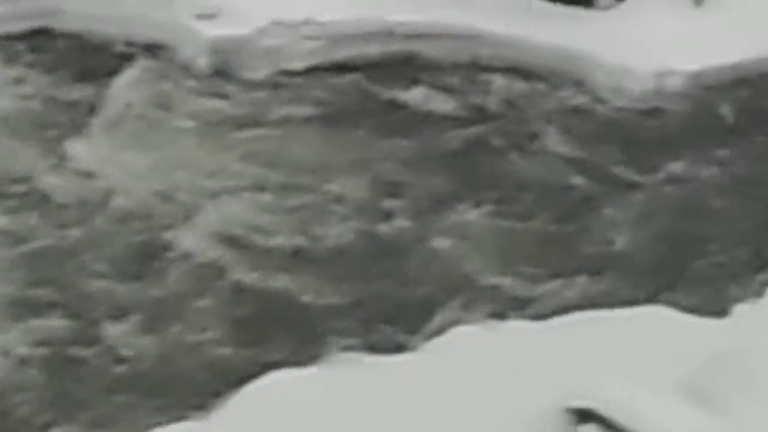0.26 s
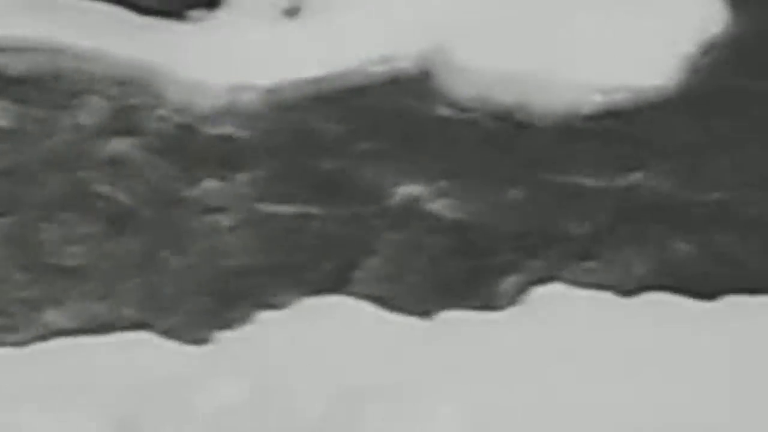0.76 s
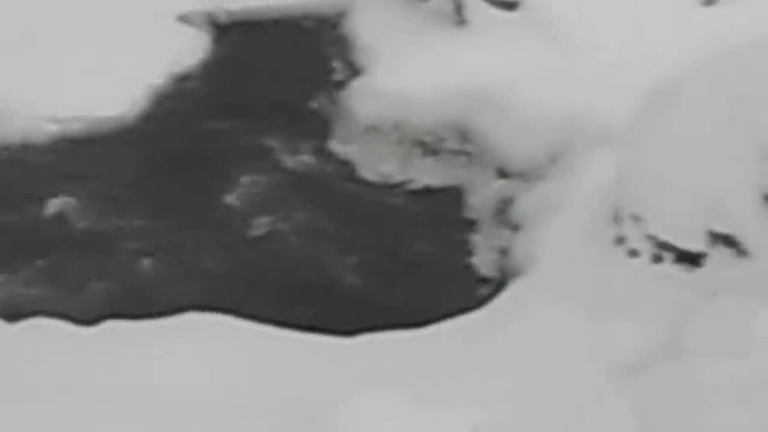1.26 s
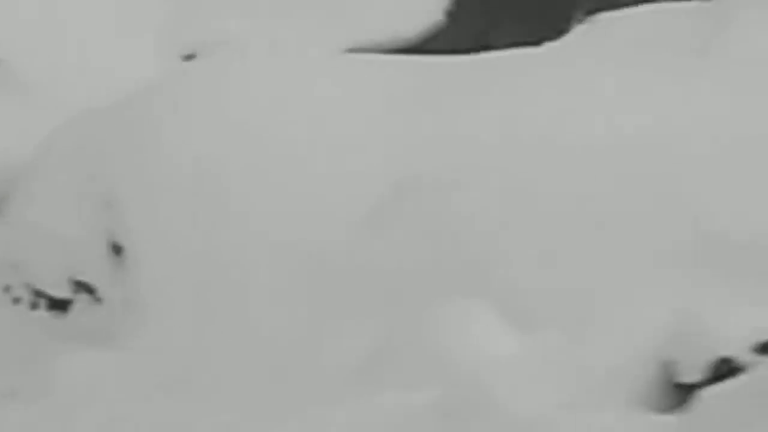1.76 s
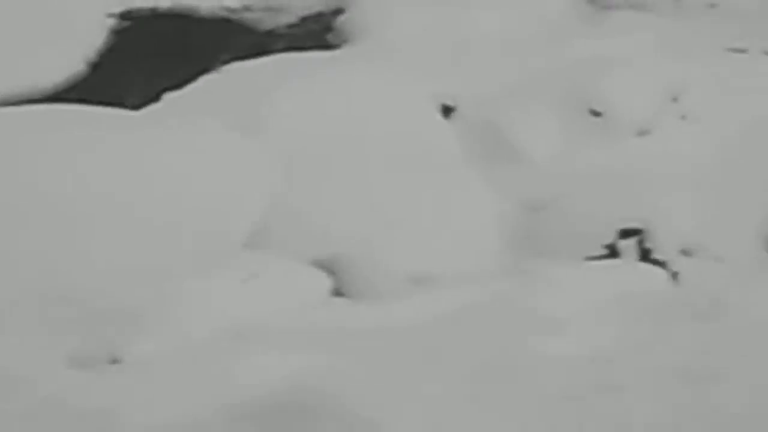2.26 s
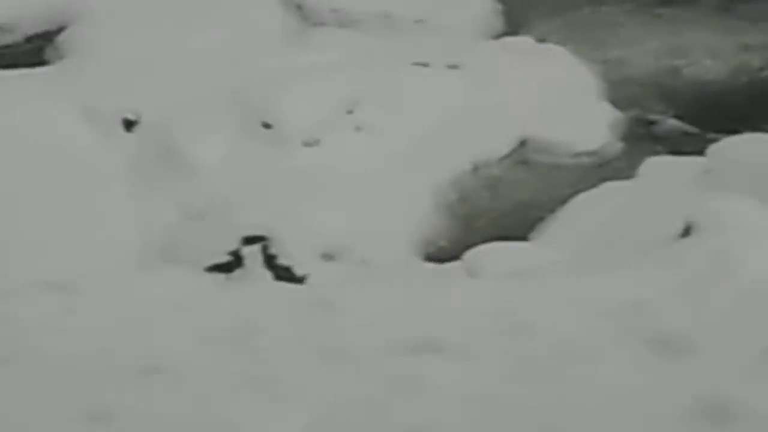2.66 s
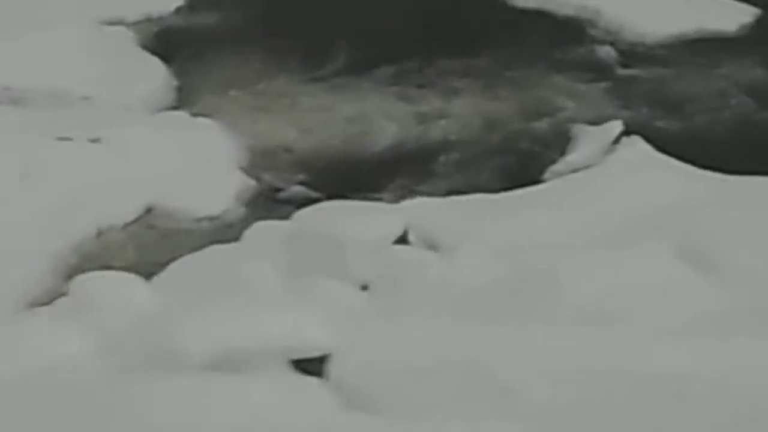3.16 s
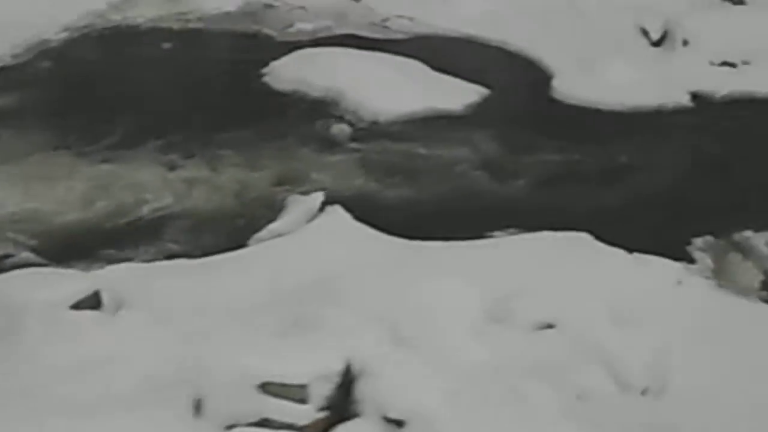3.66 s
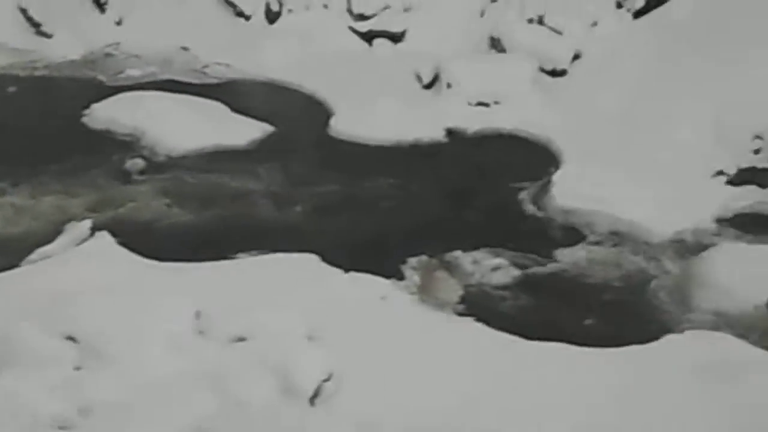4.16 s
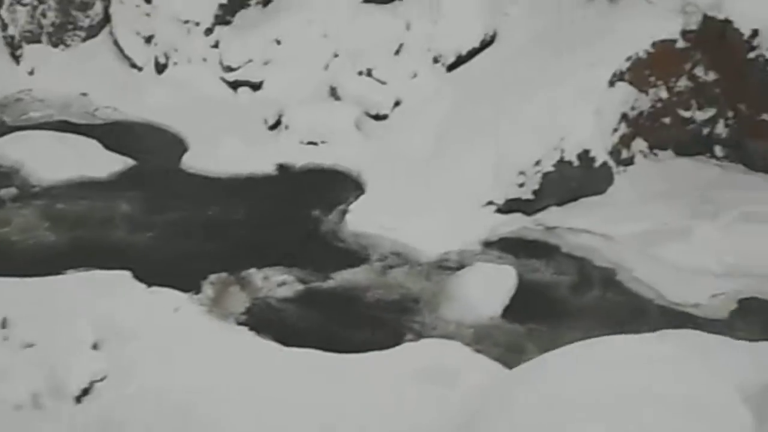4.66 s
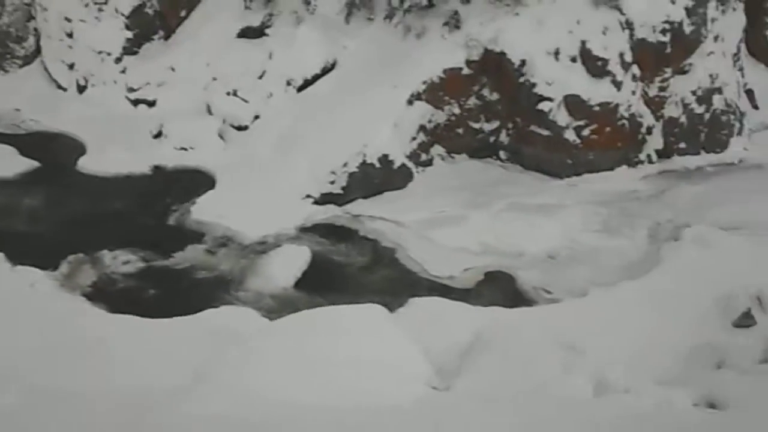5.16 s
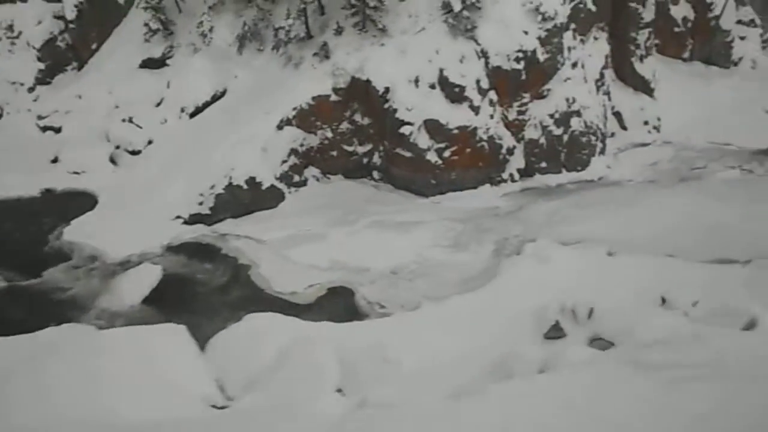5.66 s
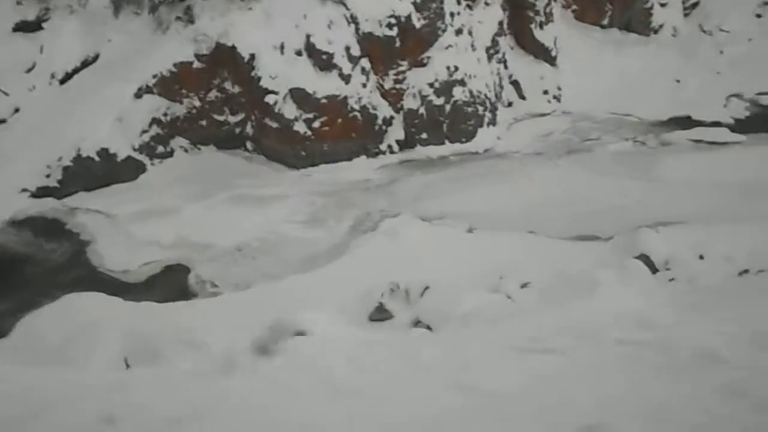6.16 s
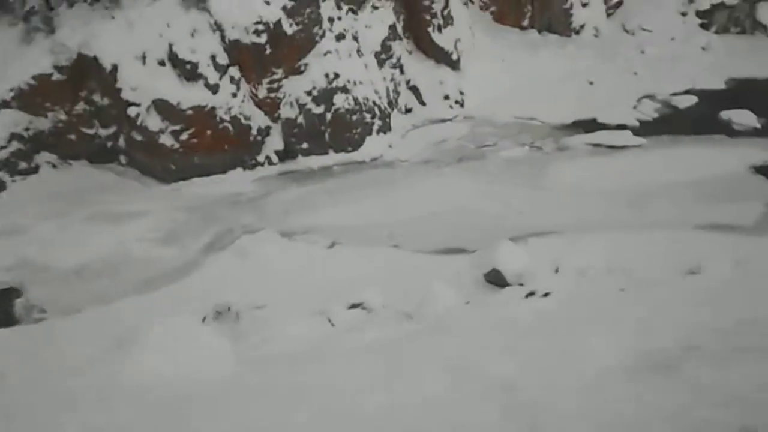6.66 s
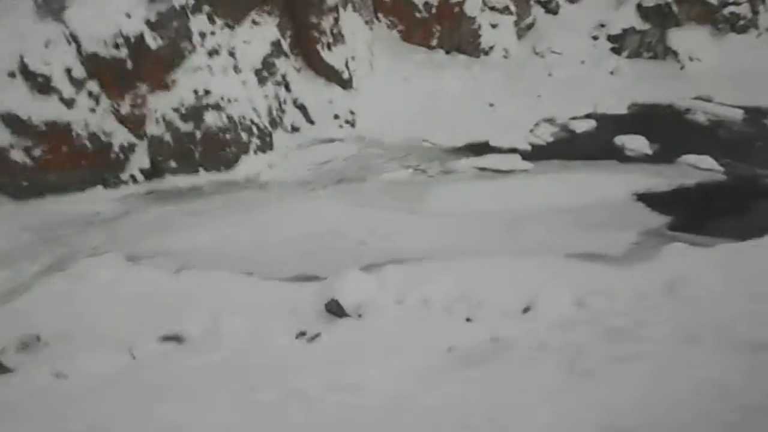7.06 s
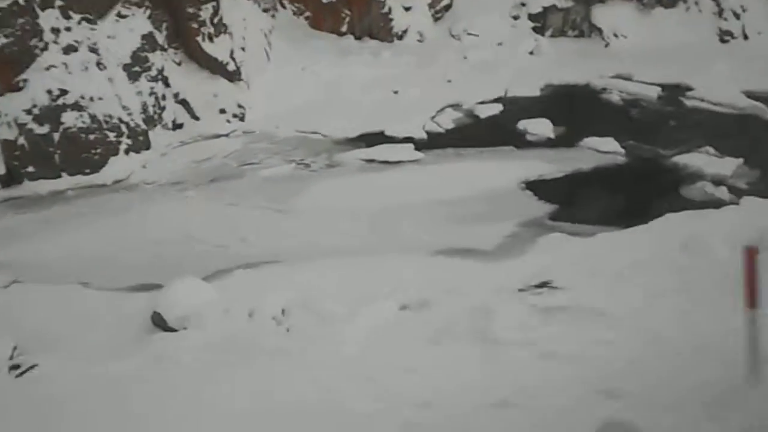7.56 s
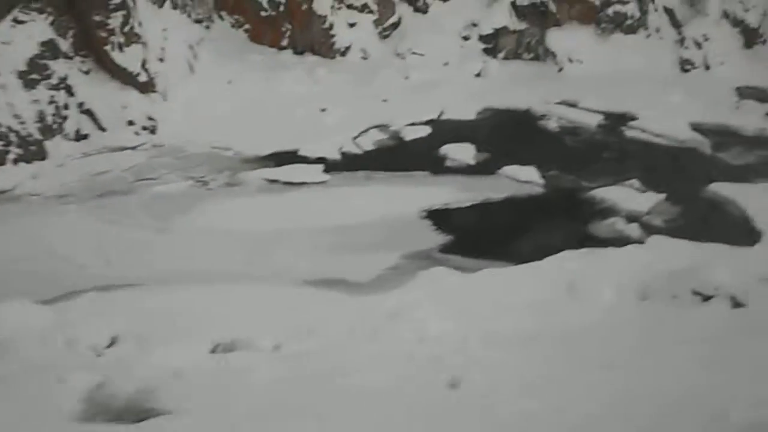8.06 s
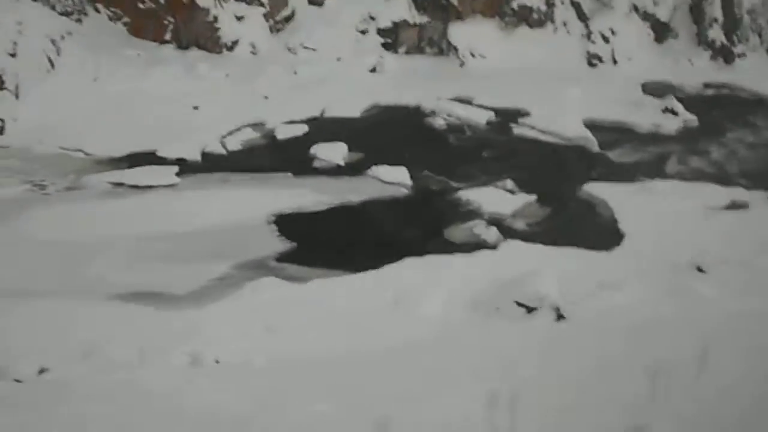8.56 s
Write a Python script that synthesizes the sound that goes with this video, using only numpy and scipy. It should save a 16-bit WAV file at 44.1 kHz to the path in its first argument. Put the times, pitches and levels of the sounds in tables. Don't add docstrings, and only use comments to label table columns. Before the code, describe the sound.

Inside a rolling train carriage, a deep rumbling roar and low sway with a steady hum, scattered dry ticks and a brief rubbery squeak.

```python
import sys
import numpy as np
from scipy import signal
from scipy.fft import rfft, irfft, next_fast_len
from scipy.io import wavfile
from scipy.ndimage import uniform_filter1d

SR = 44100
rng = np.random.default_rng(int(sys.argv[2]) if len(sys.argv) > 2 else 0)


def inscribe(sig):
    pcm = np.round(np.clip(np.atleast_2d(sig).T, -1, 1) * 32767)
    wavfile.write(sys.argv[1], SR, pcm.astype(np.int16))


def convert_level_to_amplitude(level_db):
    exponent = np.asarray(level_db, float) / 20
    return 10 ** exponent


N = 388962
TIME = np.arange(N) / SR

# [f/Hz, width/Hz, level/dB]
CABIN_AIR = [(335.4, 37, -47.5), (708, 60, -62.5), (1222, 305, -58), (1876, 110, -71.5), (61.5, 7.5, -46.5),
             (525.4, 33, -58.5), (121.7, 13, -51)]
# [f/Hz, width/Hz, gain/dB]
CABIN_GAPS = [(50, 10, -1.5), (110, 9.7, -4), (623, 18, -3), (979, 32, -10), (1180, 33, -2),
              (1290, 33, -1.5), (1730, 30, -2), (1970, 70, -3.5)]
# [f/Hz, density/dB per Hz]
ROAR_COLOUR = [(50, -23), (85, -13), (110, -15.5), (130, -5.5), (170, -20), (200, -14.5), (330, -13.5),
               (430, -21.5), (600, -23.5), (1000, -25.5), (1690, -35), (1780, -37), (4000, -48),
               (10000, -53.5)]
# [t/s, level/dB]
WHEEL_LOAD = [(0, 3.5), (.07, 5.5), (.14, 1.5), (.27, 6.5), (1.0, 3.5), (2.2, 2), (2.58, 5), (2.75, 1.5),
              (4.7, 1.5), (4.85, 0), (5.65, 1.5), (5.92, -2), (6.05, 0.5), (6.2, -1.5), (7.0, 2),
              (8.7, 0.5), (8.82, 3)]
# [centre t/s, length/s, rise/dB]
RAIL_JOINTS = [
    (0.0, 0.02, 15),
    (.1, 0.054, 14),
    (1.07, 0.17, 0.5),
    (2.58, .35, 5),
    (4.24, 0.079, 7),
    (5.0, 0.25, 3.5),
]
# [f/Hz, rms level/dB]
MOTOR_LINES = [(333.8, -52), (609, -61.5), (667.5, -60), (908, -71), (1002, -59), (1707, -71)]
# [f/Hz, width/Hz, rms level/dB]
PUMP_HOUSING = [(474, 43, -58), (437.3, 60, -50.5), (418.8, 60, -46), (380, 38, -55)]
# [t/s, level/dB]
CLOTH_LEVEL = [(0.0, -48), (.27, -61), (.59, -52), (.78, -70), (1.4, -62), (1.76, -53.5), (2.05, -72),
               (2.38, -56), (2.58, -82), (3.12, -48), (3.39, -74), (3.95, -57.5), (5.38, -54), (6.9, -53.5),
               (7.3, -65), (7.78, -64), (8.11, -46.5), (8.82, -58)]
# [t/s, length/s, f/Hz,
# width/Hz, level/dB]
CLOTH_SCUFFS = [(0, 0.051, 4860, 3500, -52.5), (2.85, 0.032, 4480, 2980, -59),
                (.23, 0.069, 3000, 6050, -60), (0.35, 0.045, 2590, 3800, -51.5),
                (0.44, 0.086, 5000, 7000, -60.5), (1.139, 0.098, 6860, 6000, -60.5),
                (1.455, 0.033, 3970, 3500, -54), (1.584, 0.05, 6460, 7000, -63),
                (2.454, 0.039, 2500, 3500, -57), (2.59, 0.062, 6000, 8000, -64),
                (4.244, 0.025, 4970, 5000, -51), (4.589, 0.011, 3500, 4000, -50),
                (5.528, 0.036, 3000, 3500, -55), (5.468, .012, 7500, 4000, -64)]
# [t/s, length/s, f/Hz,
# width/Hz, level/dB]
FITTING_SQUEALS = [(0.339, 0.24, 4500, 420, -62.5), (0.52, .25, 4400, 450, -68),
                   (1.19, 0.41, 5300, 300, -72), (1.599, 4.7, 4010, 90.5, -73.5),
                   (1.394, 3.6, 4000, 600, -67), (3.046, 0.15, 3900, 1800, -62),
                   (6.03, .065, 5800, 120, -63), (6.9, .12, 6100, 300, -70), (7.86, .1, 2500, 400, -65),
                   (7.05, .6, 3920, 700, -67.5), (3.85, .35, 6100, 300, -75),
                   (4.312, 0.055, 5300, 300, -68), (4.336, .055, 5300, 300, -65),
                   (4.342, .055, 5950, 300, -67), (4.948, 0.52, 5470, 352, -70),
                   (6.377, 0.032, 7980, 300, -66), (6.43, .03, 7700, 300, -65),
                   (6.73, 0.088, 3840, 1500, -56), (7.052, 0.66, 6240, 250, -76),
                   (7.818, 0.43, 5550, 700, -65.5), (7.9, 0.29, 6600, 1100, -68),
                   (8.25, 0.33, 3720, 700, -61), (8.398, 0.35, 4300, 500, -65),
                   (7.993, 0.23, 3180, 500, -66)]
# [t/s, length/s, f/Hz, width/Hz, level/dB]
SEAT_BUMPS = [
    (.072, .035, 500, 500, -48),
    (.352, .04, 650, 450, -50),
    (3.62, .055, 750, 500, -50),
    (4.228, .035, 480, 400, -46),
]
# [t/s, length/s, f/Hz, width/Hz, level/dB]
LOW_SWELLS = [
    (.075, 0.032, 198, 80, -40),
    (3.625, 0.044, 300, 120, -43),
    (4.23, 0.045, 150, 80, -35),
    (1.12, .16, 145, 50, -41),
    (2.9, .4, 188, 100, -44.5),
    (3.66, .12, 170, 60, -45),
    (4.05, 0.32, 170, 90, -45),
]
# [t/s, f/Hz, level/dB, share of double slips/0-1]
JOINT_PULL = [
    (5.935, 603, -56, 0.4),
    (5.958, 588, -44, 0.4),
    (5.97, 590, -44, .03),
    (5.984, 580, -35, 0.6),
    (5.997, 562, -35, 0.93),
    (6.017, 577, -41, 0.54),
    (6.034, 561, -34, .02),
    (6.044, 579, -34.5, 0.1),
    (6.06, 590, -43, 0.3),
    (6.085, 570, -54, 0.7),
]
# [t/s, f/Hz, ring/s, level/dB]
SMALL_RELEASES = [(1.0615, 4700, .003, -38), (1.066, 1500, 0.0044, -39), (7.729, 2480, 0.0018, -37),
                  (7.729, 4800, .002, -40), (8.257, 6400, .002, -40), (7.7955, 3950, 0.0022, -38),
                  (.495, 4600, .003, -39), (2.3775, 2940, .003, -41), (2.376, 5100, .002, -48),
                  (2.535, 2630, 0.0035, -40), (2.5625, 4800, .002, -37), (3.941, 3360, 0.0027, -38),
                  (4.2395, 6100, .003, -40), (4.6025, 3000, .004, -36), (5.5355, 5230, 0.0026, -44),
                  (6.0085, 5300, .002, -42), (6.011, 3200, 0.0026, -41), (6.057, 4460, 0.001, -25.5),
                  (6.0585, 1790, 0.0023, -35), (6.0737, 2300, 0.0023, -41), (6.824, 4770, .002, -43),
                  (6.918, 3400, .002, -48), (6.926, 5500, .002, -43), (6.937, 5500, .003, -46),
                  (7.0445, 5400, 0.0028, -45), (7.795, 1950, .002, -40), (7.9805, 2410, .002, -42)]
# [low f/Hz, high f/Hz]
TICK_BANDS = [(2000, 3600), (620, 2000), (3600, 6000), (6000, 12500)]
# [t/s, body/dB, knock/dB, brightness/dB, t60/s]
TRIM_SNAPS = [(1.5507, -41.5, 10, -3, 0.032), (2.3748, -37.5, 3.5, -19, 0.03), (2.533, -48, 20, -10, 0.032),
              (2.6183, -57.5, 19, 7, 0.043), (2.8325, -48, 17, 4.5, 0.032), (2.913, -44, 11.5, -2.5, 0.022),
              (6.0748, -43, -10, -29, 0.027), (6.8957, -49, 24, -12, 0.012), (6.9236, -49, 21, -8, 0.021),
              (7.729, -41.5, 17.5, -4, 0.021), (7.7444, -45.5, 13, -9, 0.036), (7.9677, -40, -7, -9, 0.013),
              (7.9791, -51, -7, -10, .027), (5.3385, -40.5, 9.5, -6, 0.022), (6.823, -45, 11, -7, 0.018),
              (5.5175, -46.5, 13, -10, .025)]
# [t/s, body/dB, knock/dB, brightness/dB]
SMALL_PANELS = [(0.0776, -41.5, 13, -2), (1.0606, -42.5, 18, 4), (1.7858, -34.5, 5, -7.5),
                (1.8305, -42, -7, -17), (2.5544, -39.5, 13, 5), (4.596, -33.5, 3, -11),
                (4.6376, -45.5, 9, -15), (5.158, -40, 2, -10.5), (6.9324, -38, -1, -5),
                (7.045, -40, 0, -17), (8.2554, -36, 6, -6)]
# [t/s, body/dB, knock/dB, brightness/dB]
LARGE_PANELS = [(.2415, -57, 28, -42), (0.2454, -59, 18, 6), (.251, -48.5, 21, 8), (0.4915, -46.5, 17, 2),
                (0.5167, -50, 14, -3), (1.4635, -47, 5, -18), (1.811, -62.5, 24, 7), (2.5838, -40.5, 7, -5),
                (2.6576, -67, 8, 14), (3.6445, -54, 2, -7), (4.2335, -42, -4, -9), (7.0191, -42, 13, -1.5),
                (8.4266, -44.5, 7, -16)]
# [t/s, body/dB, knock/dB, snap/dB, t60/s]
PLASTIC_CLIPS = [(2.4535, -42, 6, -1, 0.047), (2.8086, -52, 3, 7, 0.051), (3.9355, -37.5, 6, 2, 0.034),
                 (4.487, -47, 1, -2, 0.079), (4.5414, -48.5, -7, -2, 0.058), (6.0087, -36.5, 0, -3, 0.035),
                 (6.0554, -34.5, 6, -3, 0.017), (5.5345, -47, 0, 2, .03), (6.498, -34, -15, -4, 0.0043),
                 (7.795, -39.5, -15, -0.5, 0.0074)]
# [t/s, sway/dB, lean from floor to heave/dB]
TRACK_SWAY = [(0, -28, 10.5), (.3, -26.5, -6), (.42, -21, 0), (.6, -29, -3.5), (.75, -24, 2),
              (1.25, -25.5, 3), (1.87, -29.5, 0), (2.3, -22, 0), (3.35, -23.5, -1), (4.3, -25.5, -2.5),
              (4.8, -28, 5.5), (5.25, -30.5, 0), (5.9, -26.5, 3.5), (6.25, -30.5, -1.5), (6.85, -30.5, -1),
              (7.2, -32, 0.5), (7.9, -27, 0.5), (8.82, -33.5, 2.5)]
# [centre t/s, length/s, heave/dB, floor/dB]
BODY_LURCHES = [(.73, 0.089, -28, -21), (1.06, 0.04, -28, -17.5), (1.24, 0.094, -19, -40),
                (2.5, 0.15, -16, -19), (2.65, 0.054, -25, -12.5), (2.9, 0.043, -27, -13),
                (3.14, 0.086, -30, -21), (6.58, 0.13, -30, -29), (8.14, .1, -33, -24),
                (8.35, 0.3, -26, -45), (8.5, 0.058, -24, -20)]
# [centre t/s, length/s, wall/dB, roof/dB]
SHELL_BOOMS = [(0.285, 0.33, -43, -39), (0.54, 0.12, -31, -30.5), (0.8, 0.17, -50, -33.5),
               (1.052, 0.068, -28, -29), (1.317, 0.22, -42, -39), (1.84, 0.9, -38, -37.5),
               (2.196, 0.22, -33.5, -41), (2.53, 0.23, -28, -31), (2.76, 0.32, -32, -29.5),
               (2.992, 0.06, -49, -29.5), (3.144, 0.3, -32.5, -33.5), (3.387, 0.7, -33, -42),
               (4.073, 0.39, -32, -33.5), (4.37, 0.17, -33.5, -36), (4.625, 0.15, -36, -30.5),
               (5.048, 0.37, -31, -33.5), (5.432, 0.59, -40, -36), (5.897, 0.49, -34.5, -43),
               (6.346, 0.22, -43, -36.5), (6.7, 0.29, -38.5, -56), (7.265, 0.46, -36.5, -36),
               (7.62, 0.32, -60, -37), (8.13, 0.084, -56, -47), (8.687, 0.18, -40, -34.5)]
# [f/Hz, width/Hz]
BODY_MODES = [(19, 7.9), (30.5, 10.9), (75, 5.2), (94.8, 8.2)]
# [f/Hz, gain/dB]
RECORDER_EDGE = [(10100, 0), (11000, -18), (11700, -18), (12400, -32), (12800, -90)]


def evened(x):
    return x / np.sqrt(np.mean(x ** 2) + 1e-20)


def curves(rows, t=TIME):
    s, *columns = np.transpose(rows)
    return [np.interp(t, s, column) for column in columns]


def swells(rows):
    s, length, *columns = np.transpose(rows)[..., None]
    t = TIME[::256]
    bell = np.exp(-(2 * (t - s) / length) ** 2)
    return [np.interp(TIME, t, (column * bell).sum(0)) for column in columns]


def resonate(x, hz, width):
    turn = np.exp(2j * np.pi * np.cumsum(hz * np.ones(len(x))) / SR)
    r = np.exp(-np.pi * width / SR)
    low = x / turn + 1e-18
    for _ in range(2):
        low = signal.lfilter([1 - r], [1, -r], low)
    return turn * low


def rung_noise(hz, width):
    return evened(resonate(rng.standard_normal(N), hz, width).real)


def drift(seconds):
    size = round(seconds * SR)
    return evened(uniform_filter1d(uniform_filter1d(rng.standard_normal(N), size), size))


def cabin_air():
    return sum(convert_level_to_amplitude(db) * rung_noise(hz, width) for hz, width, db in CABIN_AIR)


def wheel_roar():
    frames, hz = N // 256 + 5, np.fft.rfftfreq(1024, 1 / SR)
    a, b, patches = rng.standard_normal((frames, 513, 3)).T
    patches = evened(uniform_filter1d(uniform_filter1d(patches, 12, 0), 14, 1))
    t = np.arange(frames) * 256 / SR
    roll_db = curves(WHEEL_LOAD, t)[0]
    thud_db = np.interp(t, TIME, swells(RAIL_JOINTS)[0]) + 0.37 * roll_db - 0.5
    low = 1 / (1 + (hz[:, None] / 300) ** 4)
    middle = (1 - low) / (1 + (hz[:, None] / 2500) ** 2)
    f, colour_db = np.transpose(ROAR_COLOUR)
    colour_db = np.interp(np.log(hz + 1), np.log(f), colour_db)[:, None]
    spectra = (a + 1j * b) * convert_level_to_amplitude(colour_db + low * thud_db + middle * roll_db + 0.97 * patches)
    return convert_level_to_amplitude(-37.5) * evened(signal.istft(spectra, nperseg=1024, noverlap=768)[1][:N])


def motor():
    out = 0
    for hz, db in MOTOR_LINES:
        level = np.sqrt(2) * convert_level_to_amplitude(db + 2.0 * drift(0.33))
        out = out + level * np.sin(2 * np.pi * hz * (TIME + 0.00018 * drift(0.23)))
    return out


def pump():
    rate_hz, rise_hz, step_s = 20.676, .604, 6.72
    turns = rate_hz * TIME + rise_hz * np.maximum(TIME - step_s, 0) + .57
    hunt = 2 * np.pi * (TIME - .7) / 2.84
    hunt = np.minimum(hunt, hunt[round(step_s * SR)])
    turns = turns - .035 * np.sin(hunt) - .02 * np.sin(2 * hunt)
    blows = sum(np.cos(2 * np.pi * k * turns) for k in range(10, 32)) * convert_level_to_amplitude(.7 * drift(0.04))
    rung = sum(convert_level_to_amplitude(db) * evened(resonate(blows, hz, width).real) for hz, width, db in PUMP_HOUSING)
    gear = np.sqrt(2) * convert_level_to_amplitude(-56.5) * np.cos(2 * np.pi * 20 * turns)
    return rung + gear


def cloth_rustle():
    level_db = curves(CLOTH_LEVEL)[0] + 0.5 * drift(0.027)
    hz = 3460 + 182 * drift(0.19)
    slips = rng.standard_normal(N) * convert_level_to_amplitude(2.4 * drift(0.0086))
    narrow = evened(resonate(slips, hz, 900).real)
    broad = evened(resonate(slips, 4000, 3000).real)
    return convert_level_to_amplitude(level_db - 13.0) * (0.91 * narrow + 1.12 * broad)


def rubs_and_bumps():
    out = np.zeros(N)
    for s, length, hz, width, db in FITTING_SQUEALS + CLOTH_SCUFFS + SEAT_BUMPS + LOW_SWELLS:
        size = round(length * SR)
        fuzz = evened(resonate(rng.standard_normal(max(size, 8000)), hz, width).real)[:size]
        out[round(s * SR):][:size] += convert_level_to_amplitude(db) * fuzz * signal.windows.tukey(size, .4)
    return out


def joint_squeak():
    hz, pull_db, twice = curves(JOINT_PULL)
    twice = np.clip(twice, 0, 1)
    third = convert_level_to_amplitude(-49 + 0.22 * (pull_db + 36))
    parts = convert_level_to_amplitude(pull_db) * np.sqrt(1 - twice), convert_level_to_amplitude(pull_db) * np.sqrt(twice), third
    turns = np.cumsum(hz * (1 + 0.008 * drift(0.0045))) / SR
    tone = 0
    for k, part in enumerate(parts, 1):
        tone = tone + part * convert_level_to_amplitude(2.7 * drift(0.0051)) * np.cos(2 * np.pi * k * turns)
    scrape = (turns % 1 < .4) * (0.45 + rng.standard_normal(N))
    scrape = third * convert_level_to_amplitude(-4.5) * evened(resonate(scrape, 3400, 3600).real)
    ends = np.minimum(TIME - JOINT_PULL[0][0], JOINT_PULL[-1][0] - TIME)
    return (np.sqrt(2) * tone + scrape) * np.clip(ends / .005, 0, 1)


def small_releases():
    out, t = np.zeros(N), np.arange(-300, 300) / SR
    for s, hz, ring, db in SMALL_RELEASES:
        bell = np.exp(-(2 * t / ring) ** 2)
        out[round(s * SR) - 300:][:600] += convert_level_to_amplitude(db) * bell * np.sin(2 * np.pi * hz * t)
    return out


def tick_rows():
    panels = TRIM_SNAPS + [(*row, 0.035) for row in SMALL_PANELS] + [(*row, 0.059) for row in LARGE_PANELS]
    rows = [(s, db, knock, 6 + 0.63 * bright, bright, t60) for s, db, knock, bright, t60 in panels]
    return rows + [(s, db, knock, snap, snap - 43, t60) for s, db, knock, snap, t60 in PLASTIC_CLIPS]


def ticks():
    out, t = np.zeros(N + SR), np.arange(6000) / SR
    bands = [signal.butter(2, edges, "band", fs=SR) for edges in TICK_BANDS]
    front = np.minimum(t / 0.00061 + 0.56, 1)
    tail = convert_level_to_amplitude(-30.5 - 60 * t / 0.39)
    for s, db, knock_db, snap_db, sizzle_db, t60 in tick_rows():
        slips = rng.standard_normal(len(t)) * (5.0 + rng.exponential(1, 100).repeat(60))
        slips[8] += 22
        parts = zip(bands, (1, -1, -1, 1), (0, knock_db, snap_db, sizzle_db), (1.6, 1.57, 1.44, 0.53))
        for band, sign, part_db, slow in parts:
            shape = convert_level_to_amplitude(-60 * t / max(t60 * slow, .004)) + tail
            part = signal.lfilter(*band, slips * shape * front)
            loudest = np.sqrt(uniform_filter1d(part ** 2, size=88).max())
            out[round(s * SR):][:len(t)] += sign * convert_level_to_amplitude(db + part_db - 6.0) * part / loudest
    return out[:N]


def shaking():
    sway_db, lean_db = curves(TRACK_SWAY)
    heave, floor = convert_level_to_amplitude(sway_db + lean_db - 2), convert_level_to_amplitude(sway_db - lean_db - 2.5)
    steady = [heave, floor, convert_level_to_amplitude(-50.5), convert_level_to_amplitude(-50.5)]
    jolts = []
    for rows in (BODY_LURCHES, SHELL_BOOMS):
        jolts += swells([(s, length, convert_level_to_amplitude(a_db), convert_level_to_amplitude(b_db)) for s, length, a_db, b_db in rows])
    return [np.hypot(rest, jolt) for rest, jolt in zip(steady, jolts)]


def carriage_body():
    out = 0
    for drive, (hz, width) in zip(shaking(), BODY_MODES):
        swing = resonate(rng.standard_normal(N), hz, width)
        size = abs(swing)
        swing = swing / (size / np.mean(size) + 0.051) ** 0.91
        swing = resonate(drive * evened(swing.real), hz, 3.04 * width + 8)
        out = out + 2 * swing.real
    return out


def cabin(x):
    size = next_fast_len(N)
    hz = np.fft.rfftfreq(size, 1 / SR)
    gain_db = sum(db * np.exp(-(2 * (hz - f) / width) ** 2) for f, width, db in CABIN_GAPS)
    return irfft(rfft(x, size) * convert_level_to_amplitude(gain_db), size)[:N]


def scene():
    far = cabin(cabin_air() + wheel_roar() + carriage_body()) + motor() + pump()
    near = cloth_rustle() + rubs_and_bumps() + joint_squeak() + small_releases() + ticks()
    return (far + near)[None]


def low_pass(x):
    return signal.sosfilt(signal.butter(12, 12300, fs=SR, output="sos"), x)


def record(dry):
    size = next_fast_len(N + 4096)
    gain = convert_level_to_amplitude(np.interp(np.fft.rfftfreq(size, 1 / SR), *np.transpose(RECORDER_EDGE)))
    limited = irfft(rfft(dry, size) * gain, size)[:, :N]
    return low_pass(limited)


dry = scene()
out = record(dry)
inscribe(out)
```